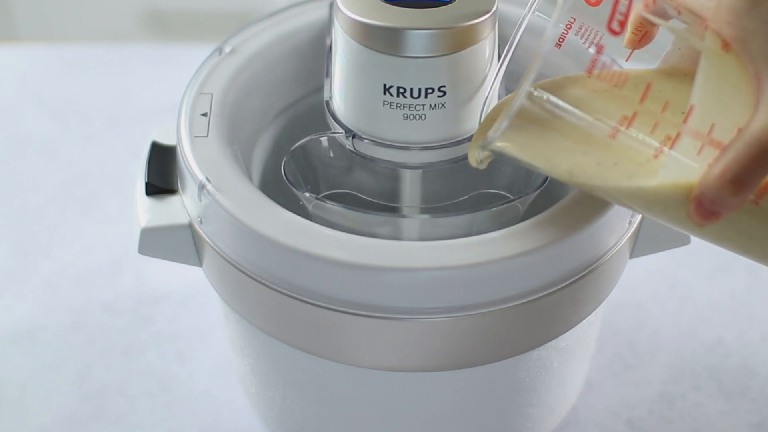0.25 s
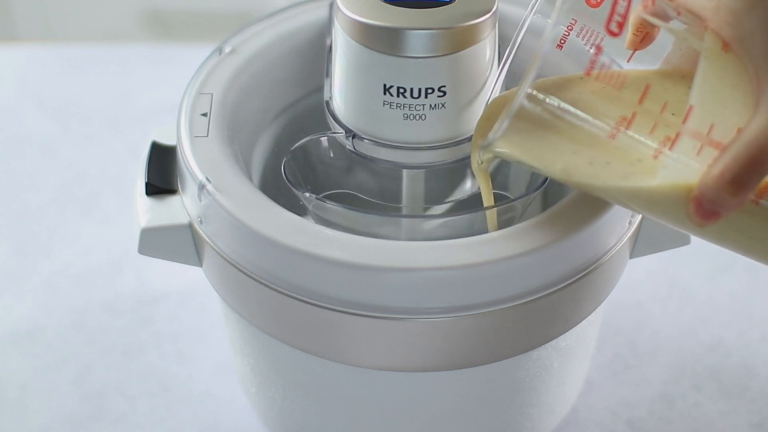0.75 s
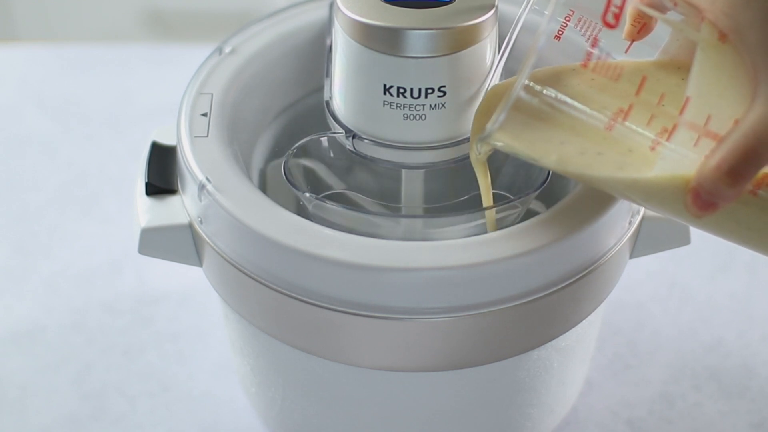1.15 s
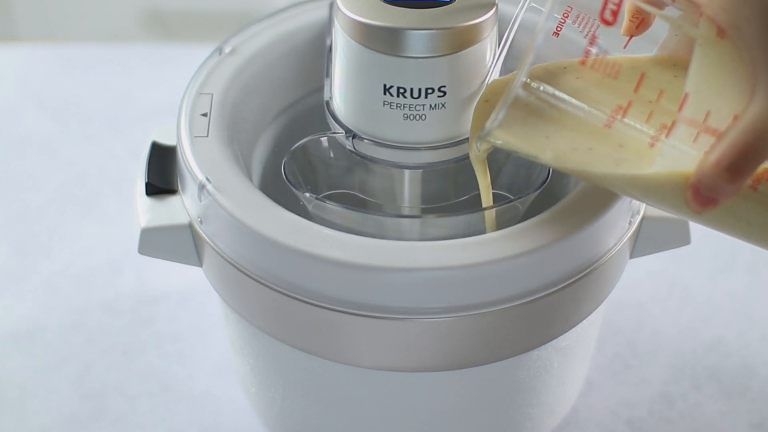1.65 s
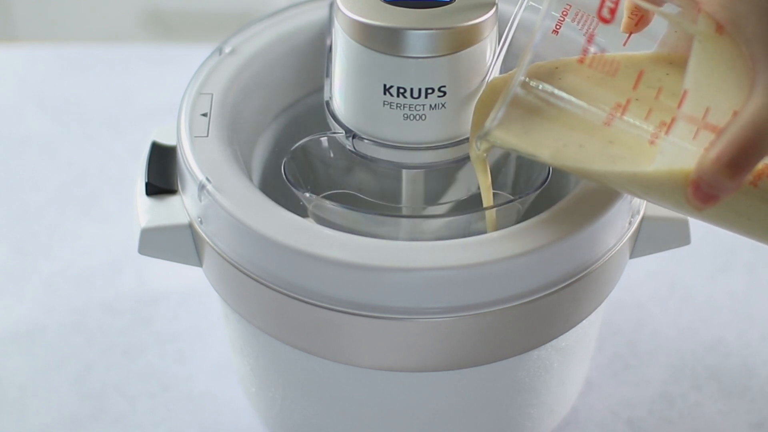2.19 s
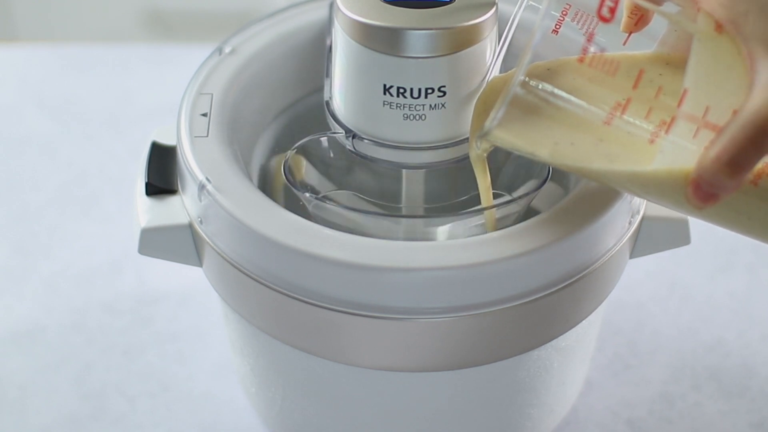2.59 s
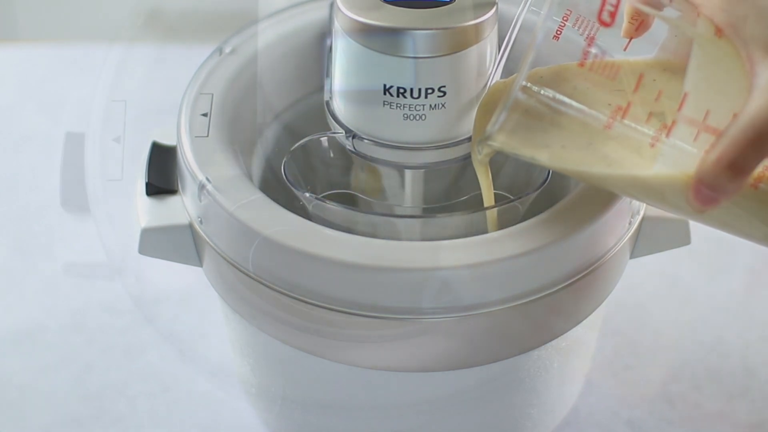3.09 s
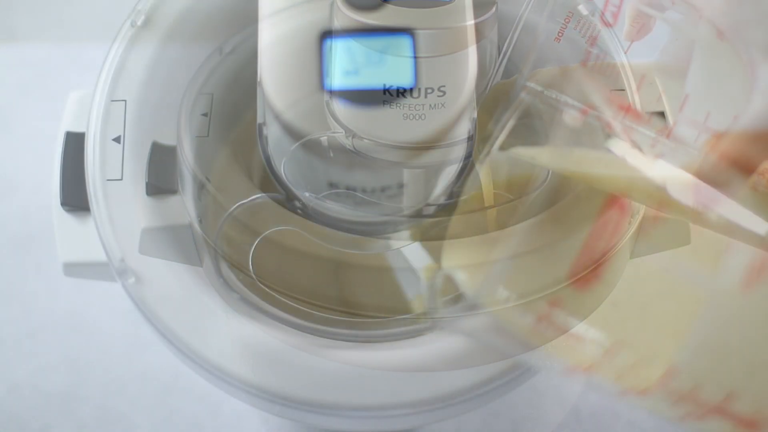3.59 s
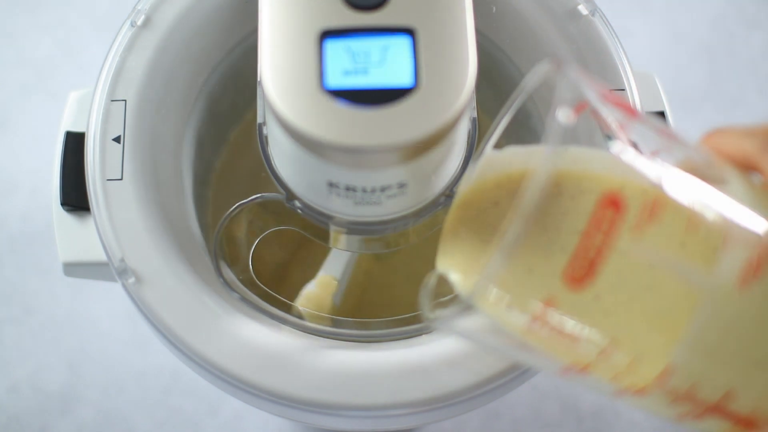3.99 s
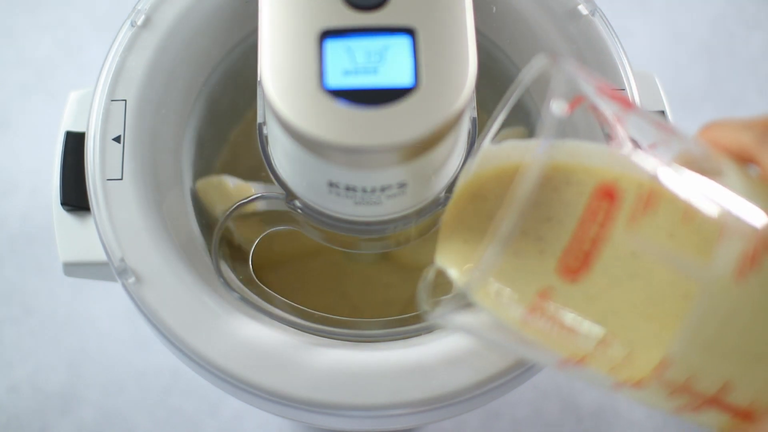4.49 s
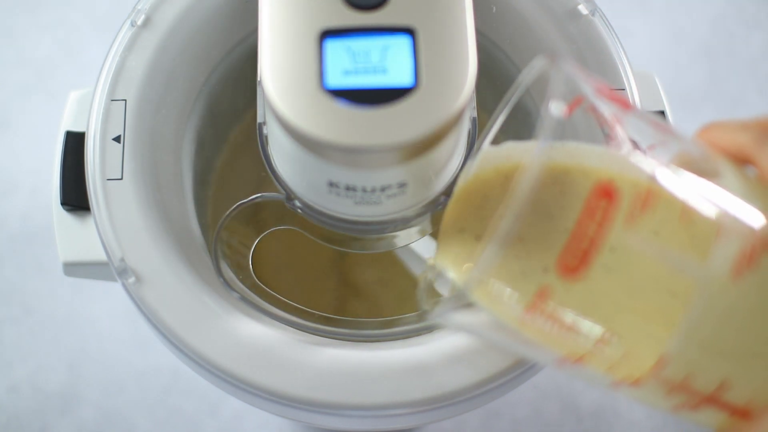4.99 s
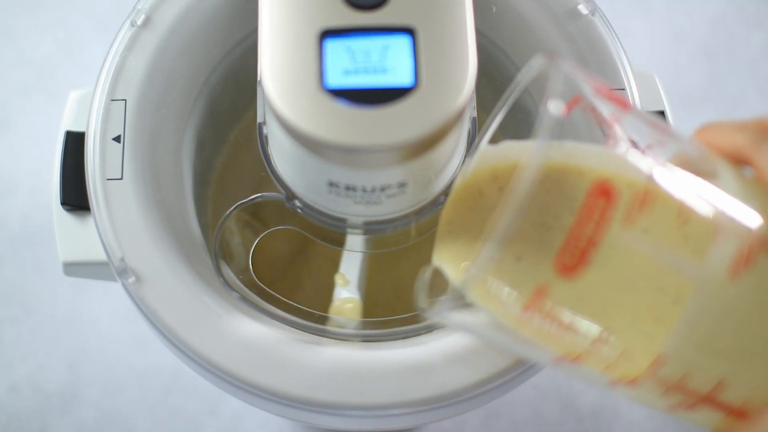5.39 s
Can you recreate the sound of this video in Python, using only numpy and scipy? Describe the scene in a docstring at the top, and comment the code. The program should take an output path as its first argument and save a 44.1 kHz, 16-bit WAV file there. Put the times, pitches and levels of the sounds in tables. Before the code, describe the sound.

The steady hum and fast gear chatter of a running ice cream maker, with soft bumps, faint pouring drips and a short spell of knocking.

```python
"""On a kitchen counter an ice cream maker runs while custard is poured in with small ringing bubbles.
Its synchronous motor hums at multiples of 50 Hz; a gear turning ten times a second grinds, sings and
taps alike on every turn, shaking housing and lid. As the paddle takes up load it catches and bumps,
and the drive strains, binds, then knocks for a moment. The sound is heard first from beside the bowl,
then from above the lid, where the drive runs freely again."""
import sys
import numpy as np
from scipy import signal
from scipy.fft import rfft, irfft
from scipy.io import wavfile
from scipy.ndimage import uniform_filter1d

SR = 44100
rng = np.random.default_rng(int(sys.argv[2]) if len(sys.argv) > 2 else 0)


def master_out(mix):
    """Clip the mix to full scale and print it as 16-bit PCM to the path in sys.argv[1]."""
    frames = np.transpose(np.atleast_2d(mix))
    ceiling = np.clip(frames, -1, 1)
    pcm = np.round(ceiling * 32767).astype(np.int16)
    wavfile.write(sys.argv[1], SR, pcm)


N = 249165
TIME = np.arange(N) / SR
MOTOR_HZ, GEAR_HZ = 50, 10  # turns a second
KNOCK_S, KNOCK_ATTACK_S = 2.95, 0.016  # the drive breaks free and starts to knock

# catches of the paddle: start_s, level_db, hum_sag_db, sag_peak_s, pitch_ratio
PADDLE_JOLTS = [(.36, -51, 2, 0.023, 1.2), (.462, -37, 6.5, 0.09, 0.89), (0.72, -52, 5, 0.01, 1.2),
                (0.987, -44, 10, 0.014, 1.2), (1.372, -38.5, 4, 0.019, 1.04), (2.974, -37.5, 1, .01, 1.8),
                (3.395, -39, 12, 0.01, 1), (3.482, -35, 7, 0.019, 1), (3.53, -32, -0.5, 0.0093, 0.93),
                (3.572, -35, 16, 0.015, 1.25), (3.606, -33.5, -4, 0.012, 1.4)]
# the main hum above the lid: time_s, level_db
HUM_LEVEL_ABOVE = [(3.76, -45.5), (3.87, -41.5), (4.55, -42), (4.8, -46)]


def undb(db):
    """Decibels as an amplitude ratio."""
    return 10 ** (np.asarray(db) / 20)


def curve(rows, column=1):
    """Linear interpolation of one table column in time."""
    rows = np.array(rows)
    return np.interp(TIME, rows[:, 0], rows[:, column])


def ramp(start_s, length_s):
    """A linear rise from 0 to 1."""
    return np.clip((TIME - start_s) / length_s, 0, 1)


def walk(rate_hz):
    """Smooth random modulation with a spread near 1."""
    knots = (np.arange(int(rate_hz * N / SR) + 3) - rng.random()) / rate_hz
    return 1.2 * np.interp(TIME, knots, rng.standard_normal(len(knots)))


def cycle(hz, crest_s):
    """Periodic modulation: a cosine with a crest at crest_s."""
    return np.cos(2 * np.pi * hz * (TIME - crest_s))


def swell(age, peak_s):
    """The envelope of a damped response to a soft push: it rises to 1 and decays."""
    u = np.maximum(age, 0) / peak_s
    return (u * np.exp(1 - u)) ** 3


def ring(age, hz, peak_s):
    """Damped vibration of one softly pushed mode."""
    return swell(age, peak_s) * np.sin(2 * np.pi * hz * age)


def each_turn(turn_hz, start_s, hz, peak_s):
    """Periodic impacts on one mode, each ringing on under the next."""
    age = (TIME[:SR // turn_hz] - start_s) % (1 / turn_hz)
    return np.resize(ring(age, hz, peak_s) + ring(age + 1 / turn_hz, hz, peak_s), N)


def band(x, hz, width_hz):
    """A resonance as a band-pass filter; rms 1."""
    edges = np.clip([hz - width_hz / 2, hz + width_hz / 2], 20, SR / 2 - 100)
    y = signal.sosfilt(signal.butter(2, edges, "band", fs=SR, output="sos"), x)
    return y / y.std()


def colour(x, rows, column=1):
    """Spectral shaping: white noise of rms 1 takes on a density in dB per Hz."""
    rows = np.array(rows)
    hz = np.maximum(np.arange(N // 2 + 1) * SR / N, 1)
    db = np.interp(np.log(hz), np.log(rows[:, 0]), rows[:, column])
    return irfft(rfft(x) * undb(db) * np.sqrt(SR / 2), N)


def hum(above, binding, knocking, level_db=-34.5, catch_db=12, catch_s=0.04):
    """Resonance of the housing at the sixth motor harmonic; it fades in binding, returns in knocking."""
    catch = ramp(KNOCK_S - 2 * catch_s, catch_s)  # a deep dip just before the knocking
    before_knock = undb(-catch_db * catch) * (1 - 0.74 * binding) * (1 - ramp(KNOCK_S, KNOCK_ATTACK_S))
    beside = undb(level_db) * (before_knock * (1 - above) + knocking)
    level = beside + above * undb(curve(HUM_LEVEL_ABOVE))
    sag_db = sum(db * swell(TIME - start_s, peak_s) for start_s, _, db, peak_s, _ in PADDLE_JOLTS)
    throb_db = (0.1 + 1.9 * above) * cycle(GEAR_HZ, 0.075)
    gain = level * undb(walk(8) + throb_db - sag_db)
    return np.sqrt(2) * gain * np.sin(2 * np.pi * 6 * MOTOR_HZ * TIME + 0.2 * walk(6))


def drone(strain, binding):
    """Forced vibration: load brings up the second and third motor harmonics and a faint rumble."""
    phase = 2 * np.pi * MOTOR_HZ * TIME
    rumble = undb(-9) * band(rng.standard_normal(N), hz=130, width_hz=100)
    harmonics = np.sin(2 * phase) + undb(2 * walk(10)) * np.sin(3 * phase)
    return np.sqrt(2) * undb(-80 + 10 * strain + 9.5 * binding) * (harmonics + rumble)


def tones(above, strain, knocking, waver_db=1.4, damped_hz=1100, damped_db=10):
    """A line spectrum locked to the mains; strain and knocking favour the odd motor harmonics."""
    # steady tones of motor and gears: pitch_hz, beside_db, above_db
    partials = [(150, -78, -70.5), (200, -57.5, -84), (250, -59, -67), (400, -47, -62), (600, -51.5, -64),
                (650, -60, -67.5), (750, -62, -62), (760, -58, -74), (900, -56, -63), (1050, -60, -73),
                (1100, -52.5, -66), (1150, -60, -68), (1200, -61, -70), (1250, -72, -64), (1400, -58, -68),
                (1450, -68, -69), (1500, -55.5, -67), (1550, -64, -68), (1600, -63, -80),
                (1700, -62.5, -65), (1850, -69, -77), (2000, -68, -71), (2050, -65.5, -73),
                (2150, -60, -76), (2250, -65, -78), (2300, -65, -78), (2350, -65.5, -84),
                (2450, -61.5, -65), (2500, -63, -78), (2550, -69, -79), (2650, -65, -76), (3150, -77, -90)]
    out = 0
    for hz, beside_db, above_db in partials:
        odd = hz % (2 * MOTOR_HZ) == MOTOR_HZ
        load_db = 0.5 * strain + 1.5 * knocking if odd else -0.5 * strain - 4 * knocking
        if hz == damped_hz:
            load_db -= damped_db * knocking
        db = beside_db + above * (above_db - beside_db) + load_db + waver_db * walk(4.8)
        out += undb(db) * np.sin(2 * np.pi * (hz * TIME + rng.random()) + 0.3 * walk(4))
    return np.sqrt(2) * out


def strain_tone(hz=700):
    """A motor harmonic that grows under load and gives way when the drive knocks."""
    # the tone's envelope: time_s, level_db
    levels = [(1.1, -56), (1.9, -50), (2.8, -52), (3.05, -59.5), (3.55, -61.5), (3.7, -80)]
    return np.sqrt(2) * undb(curve(levels)) * np.sin(2 * np.pi * hz * TIME + 0.15 * walk(5))


def knocks(above, knocking, level_db=-34, idle_share=0.36):
    """Periodic impact: the drive strikes the housing once a motor turn, lightly until it breaks free."""
    strength = idle_share * (1 - above) + (1 - idle_share) * knocking
    return strength * undb(level_db) * each_turn(MOTOR_HZ, start_s=0.01767, hz=340, peak_s=0.0085)


def teeth(turn_hz):
    """Periodic noise: the roughness of one wheel repeats on every turn; rms 1."""
    size = int(SR / turn_hz)
    hz = turn_hz * np.arange(size // 2 + 1)
    own = (hz % MOTOR_HZ > 0) | (turn_hz == MOTOR_HZ)  # the gear omits the motor's harmonics
    turn = irfft(own * np.exp(2j * np.pi * rng.random(len(hz))), size)
    return np.resize(turn / turn.std(), N)


def grinding(motor_share):
    """Roughness excitation: pinion and gear repeat their noise while slower wheels shift the contact."""
    weights = np.array([walk(2) for _ in range(4)])
    creep = sum(w * teeth(GEAR_HZ) for w in weights) / np.linalg.norm(weights, axis=0)
    rough = motor_share * teeth(MOTOR_HZ) + 0.5 * teeth(GEAR_HZ) + 0.45 * creep
    rough += 0.25 * rng.standard_normal(N)
    # more of the treble is pure chance
    hiss_share = np.interp(np.arange(N // 2 + 1) * SR / N, [2700, 3800], [0, 0.15])
    hiss = np.sqrt(hiss_share) * rfft(rng.standard_normal(N))
    return irfft(np.sqrt(1 - hiss_share) * rfft(rough / rough.std()) + hiss, N)


def pressure(ripple_db, ripple_s, sway_db, sway_s):
    """Amplitude modulation: tooth pressure ripples twice a motor turn, sways once a gear turn; rms 1."""
    gain = undb(ripple_db * cycle(2 * MOTOR_HZ, ripple_s) + sway_db * cycle(GEAR_HZ, sway_s))
    return gain / np.sqrt(np.mean(gain ** 2))


def contact(centre_s, spread_s):
    """A Gaussian pulse: a brief touch at one place of every gear turn."""
    offset_s = (((TIME[:SR // GEAR_HZ] - centre_s) * GEAR_HZ + 0.5) % 1 - 0.5) / GEAR_HZ
    return np.resize(np.exp(-0.5 * (offset_s / spread_s) ** 2), N)


def scrapes(rows, scatter_db=2):
    """Friction noise: rough teeth pass once a gear turn, each exciting its own resonance."""
    rough = grinding(motor_share=0.1)
    return sum(band(rough, hz, width_hz) * contact(centre_s, spread_s) * undb(db + scatter_db * walk(9.1))
               for centre_s, spread_s, hz, width_hz, db in rows)


def whine(rows, scatter_db=1.4):
    """Tone bursts: smooth teeth sing in turn, roughened a little by phase modulation."""
    out, wobble = 0, 0.3 * walk(6.4) + 0.15 * walk(350)
    for centre_s, spread_s, hz, db in rows:
        envelope = undb(db + scatter_db * walk(7.6)) * contact(centre_s, spread_s)
        out += envelope * np.sin(2 * np.pi * hz * TIME + wobble)
    return np.sqrt(2) * out


def gears(above, strain):
    """Source and filter: grinding sounds through the housing, joined by scraping and singing teeth."""
    # the housing's response to grinding: frequency_hz, beside_db_per_hz, above_db_per_hz
    housing = [(112, -94.5, -99), (233, -79, -99.5), (295, -69, -70), (420, -73, -78.5), (595, -74.5, -79),
               (730, -78, -88.5), (1100, -79, -83.5), (1610, -81.5, -88.5), (1830, -83.5, -86),
               (2090, -83.5, -85), (2710, -85, -92.5), (2890, -95, -95.5), (3240, -92.5, -101),
               (3600, -103, -102), (3980, -100, -100), (4380, -102, -103), (4340, -106.5, -114),
               (6750, -121, -114), (10500, -139, -131)]
    # rough teeth within a turn: centre_s, spread_s, pitch_hz, width_hz, level_db
    rough_beside = [(.02, .002, 5800, 1200, -77), (.094, .005, 4050, 800, -68),
                    (.039, .0015, 2550, 450, -55)]
    rough_above = [(.021, .007, 2000, 600, -54), (.036, .014, 1600, 550, -52),
                   (.055, .009, 1750, 600, -53.5), (.043, .0018, 4100, 520, -61),
                   (.085, .004, 4100, 400, -64), (.013, .002, 3950, 600, -66), (.024, .005, 3950, 600, -69),
                   (.062, .002, 4000, 500, -68), (.075, .002, 4050, 450, -67), (.019, .005, 5500, 350, -77),
                   (.044, .0025, 5550, 300, -73.5)]
    # smooth teeth within a turn: centre_s, spread_s, pitch_hz, level_db
    smooth_beside = [(.019, .003, 2620, -55), (.029, .006, 2240, -52), (.039, .004, 2330, -54),
                     (.058, .0045, 2520, -52.5), (.079, .003, 2470, -57), (.02, .004, 1500, -51),
                     (.06, .004, 1500, -52), (.038, .004, 3120, -67), (.056, .004, 3230, -68),
                     (.021, .004, 3200, -68)]
    smooth_above = [(.013, .005, 2010, -55), (.015, .005, 2500, -58), (.023, .005, 1900, -58),
                    (.016, .004, 1500, -56), (.033, .005, 1570, -56), (.036, .003, 2930, -65),
                    (.065, .005, 2420, -57), (.069, .005, 2100, -60)]
    # above the lid singing gives way to rasping: time_s, scrape_gain_db, whine_gain_db
    balance = [(3.8, -1.5, -1.5), (4.1, -1, 2.5), (4.55, -1, 2), (4.75, -1, 4.5), (5.04, 1.5, -2.5),
               (5.16, -4.5, -7), (5.33, 2.5, -7), (5.6, -1.5, 0)]
    side = grinding(motor_share=0.2) * pressure(ripple_db=3.5, ripple_s=0.0095, sway_db=0.5, sway_s=0.027)
    side = colour(side, housing) + scrapes(rough_beside) + whine(smooth_beside)
    top = grinding(motor_share=0.15) * pressure(ripple_db=3.5, ripple_s=0.0042, sway_db=-1.7, sway_s=0.026)
    top = colour(top, housing, column=2) + scrapes(rough_above) * undb(curve(balance))
    top += whine(smooth_above) * undb(curve(balance, column=2))
    return (np.sqrt(1 - above) * side + np.sqrt(above) * top) * undb(-1 + 0.5 * strain)


def lid():
    """Narrow-band resonance: grinding makes the lid sing, throbbing slightly with the gear."""
    # the lid's envelope: time_s, level_db
    levels = [(.1, -54.5), (.8, -58.5), (1.5, -60.5), (2.4, -55), (3.2, -66.5), (3.9, -64.5), (4.25, -54.5),
              (4.6, -52.5), (4.9, -59), (5.15, -69)]
    shaken = band(grinding(motor_share=0.15), hz=1164, width_hz=100)
    running_rms = np.sqrt(uniform_filter1d(shaken ** 2, 2 * SR // GEAR_HZ))
    return shaken / running_rms * undb(curve(levels) + 0.5 * cycle(GEAR_HZ, 0.034))


def taps(rows, low_gain_db=0, low_hz=450, scatter_db=1.3):
    """Impacts of varying strength ring their modes at the same places of every gear turn."""
    out = 0
    for start_s, hz, peak_s, db in rows:
        strength = undb(db + low_gain_db * (hz < low_hz) + scatter_db * walk(10))
        out += strength * each_turn(GEAR_HZ, start_s, hz, peak_s)
    return out


def backlash(above):
    """Play between the teeth closes with an impact; above the lid the low taps follow the hum's level."""
    # taps within a gear turn: start_s, pitch_hz, peak_s, level_db
    taps_beside = [(.037, 552, .0061, -32.3), (.057, 552, .0061, -31.5), (.077, 552, .0061, -33),
                   (.097, 547, .006, -37.5), (.018, 400, .007, -45)]
    taps_above = [(.001, 535, .0055, -41.5), (.021, 535, .0055, -41.5), (.041, 535, .0055, -42),
                  (.081, 535, .005, -44.5), (.0165, 408, .013, -39.5), (.0533, 408, .008, -45),
                  (.0765, 408, .006, -49), (.035, 330, .016, -52)]
    hum_change_db = curve(HUM_LEVEL_ABOVE) - np.mean(HUM_LEVEL_ABOVE, axis=0)[1]
    return (1 - above) * taps(taps_beside) + above * taps(taps_above, low_gain_db=1.5 * hum_change_db)


def kitchen_air(above):
    """Ambient noise, strongest in the bass and louder above the lid."""
    # the air's spectrum: frequency_hz, density_db_per_hz
    spectrum = [(20, -100), (60, -96), (95, -98), (150, -95), (1000, -110), (5000, -128), (10000, -138),
                (16000, -139)]
    return colour(rng.standard_normal(N), spectrum) * undb(2 * walk(3) + 6.7 * above - 1.5)


def jolts(detune=0.027):
    """Modal ringing: each catch of the paddle bumps the housing at slightly different pitches."""
    # modes of the housing: pitch_hz, peak_s, gain_db
    modes = [(130, 0.0061, -16.5), (272, 0.019, -3), (324, 0.017, 0.5), (383, .008, -8),
             (560, 0.0022, -10.5)]
    out = np.zeros(N)
    for start_s, db, _, _, pitch_ratio in PADDLE_JOLTS:
        part = slice(int(start_s * SR), int(start_s * SR) + SR // 10)
        for mode_hz, peak_s, mode_db in modes:
            hz = mode_hz * pitch_ratio * (1 + detune * rng.standard_normal())
            out[part] += undb(db + mode_db) * ring(TIME[part] - start_s, hz, peak_s)
    return out


def thuds():
    """Low noise bursts: the bowl shifts with a soft, unpitched thud."""
    # shifts of the bowl: start_s, peak_s, centre_hz, level_db
    shifts = [(.485, 0.032, 85, -57), (1.385, 0.03, 115, -62), (2.29, .06, 75, -59.5),
              (3.555, 0.02, 60, -55)]
    return sum(undb(db) * swell(TIME - start_s, peak_s) * band(rng.standard_normal(N), hz, width_hz=hz)
               for start_s, peak_s, hz, db in shifts)


def drips(attack_s=0.001, decay_s=0.005, rise_per_s=1.5, splash_db=-5, splash_s=0.013):
    """Bubble resonance: each bubble of the pour rings briefly, rising in pitch, inside a soft splash."""
    # bubbles in the custard: start_s, pitch_hz, level_db
    bubbles = [(1.18, 2800, -48.5), (1.295, 3720, -56.5), (1.335, 3080, -49.5), (1.446, 3600, -50),
               (1.709, 4270, -54.5), (1.79, 3100, -54), (2.25, 2800, -47), (2.657, 3130, -56),
               (2.718, 2800, -52)]
    out, age = np.zeros(N), TIME[:SR // 8]
    onset = 1 - np.exp(-age / attack_s)
    for start_s, hz, db in bubbles:
        bubble = np.exp(-age / decay_s) * np.sin(2 * np.pi * hz * age * (1 + rise_per_s * age / 2))
        spray = band(rng.standard_normal(len(age)), hz, 0.24 * hz)
        splash = undb(splash_db) * np.exp(-age / splash_s) * spray
        out[int(start_s * SR):][:len(age)] += undb(db) * onset * (bubble + splash)
    return out


def ticks(rise_s=0.00023, decay_s=0.0082, tail_db=-17, tail_s=0.08):
    """Transients: short noise bursts, each with a faint tail of kitchen reverberation."""
    # ticks of custard, paddle and plastic: start_s, centre_hz, level_db
    tick_events = [(1.384, 11500, -78.5), (2.703, 7150, -66.5), (2.82, 3300, -56), (1.99, 4600, -68),
                   (2.32, 4800, -68), (2.917, 4500, -63), (2.972, 4000, -59), (3.025, 6030, -74),
                   (3.541, 3030, -51), (3.613, 1520, -39.5), (4.115, 2040, -45), (4.232, 2950, -53),
                   (4.431, 2800, -47.5), (4.435, 6500, -67), (4.613, 1990, -43), (4.65, 6750, -67),
                   (4.71, 6940, -64), (4.861, 7000, -64), (5.398, 10200, -73), (5.423, 7500, -56.5),
                   (5.425, 10500, -74), (5.495, 3730, -53.5)]
    out, age = np.zeros(N), TIME[:SR // 5]
    decay = np.exp(-age / decay_s) + undb(tail_db) * np.exp(-age / tail_s)
    envelope = (1 - np.exp(-age / rise_s)) ** 2 * decay
    for start_s, hz, db in tick_events:
        burst = undb(db) * envelope * band(rng.standard_normal(len(age)), hz, 0.27 * hz)
        part = out[int(start_s * SR):][:len(age)]
        part += burst[:len(part)]
    return out


def scene(change_s=3.64, change_length_s=0.076):
    """Superposition of all sources, heard first from beside the bowl and then, after a brief crossfade, from
    above the lid."""
    above = ramp(change_s - change_length_s / 2, change_length_s)
    strain = ramp(start_s=1, length_s=0.62) * (1 - above)  # custard loads the paddle
    binding = ramp(start_s=2, length_s=KNOCK_S - 2) * (1 - above)
    knocking = ramp(KNOCK_S, KNOCK_ATTACK_S) * (1 - above)
    tapping = backlash(above)
    motor = hum(above, binding, knocking) + drone(strain, binding) + tones(above, strain, knocking)
    motor += strain_tone() + knocks(above, knocking)
    air = kitchen_air(above)
    machine = motor + gears(above, strain) + lid() + tapping
    return (machine + air + jolts() + thuds() + drips() + ticks())[None]


def record(dry, top_hz=15700):
    """A steep low-pass filter removes the highest treble."""
    return signal.sosfilt(signal.ellip(8, 0.2, 70, top_hz, fs=SR, output="sos"), dry)


dry = scene()
out = record(dry)
master_out(out)
```